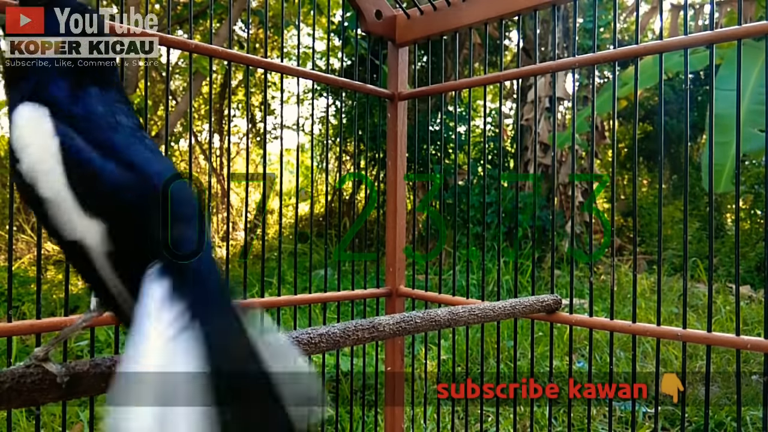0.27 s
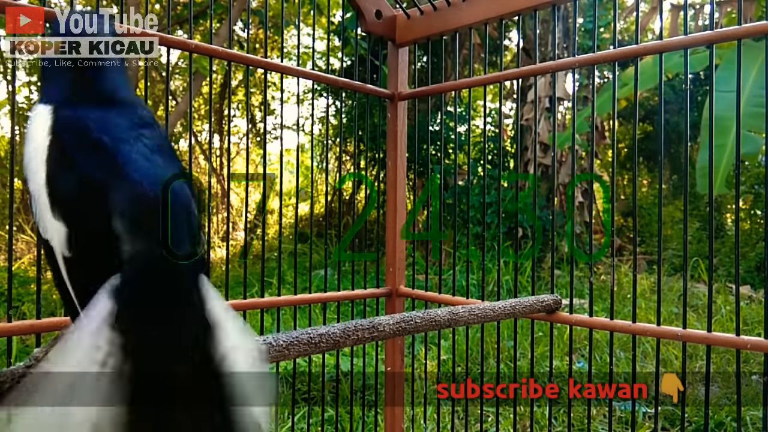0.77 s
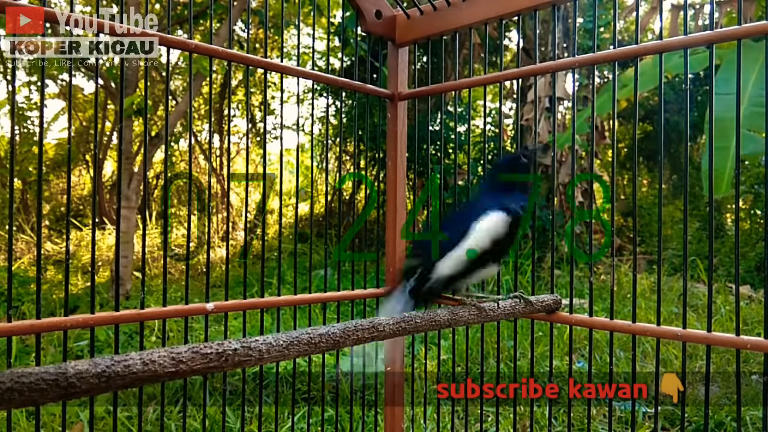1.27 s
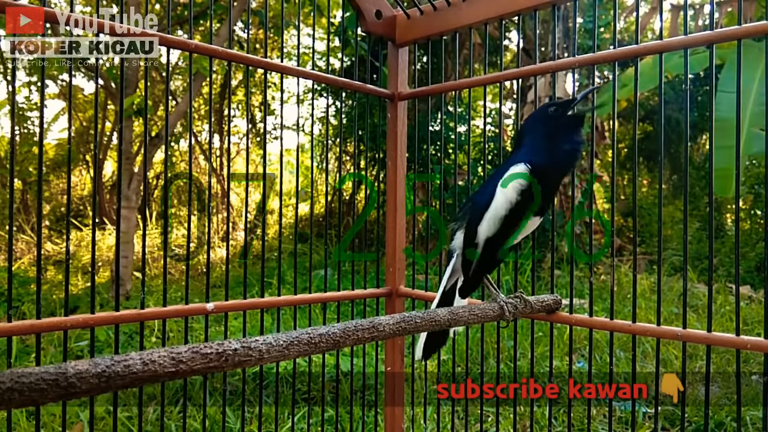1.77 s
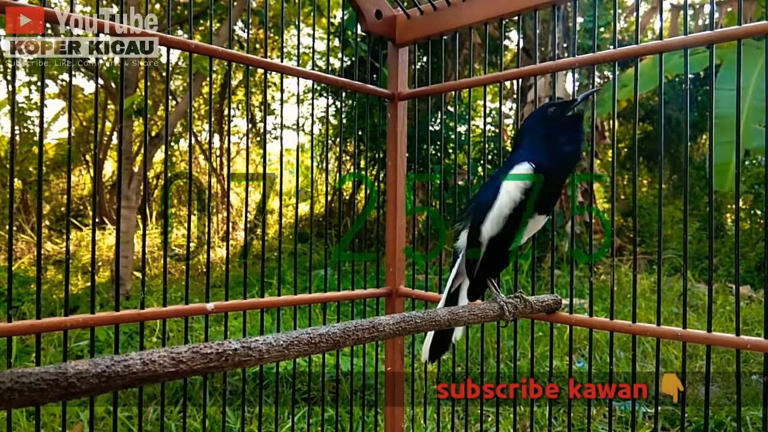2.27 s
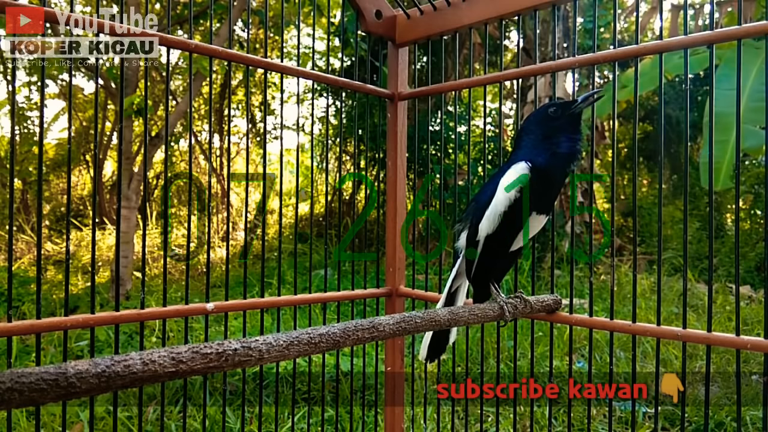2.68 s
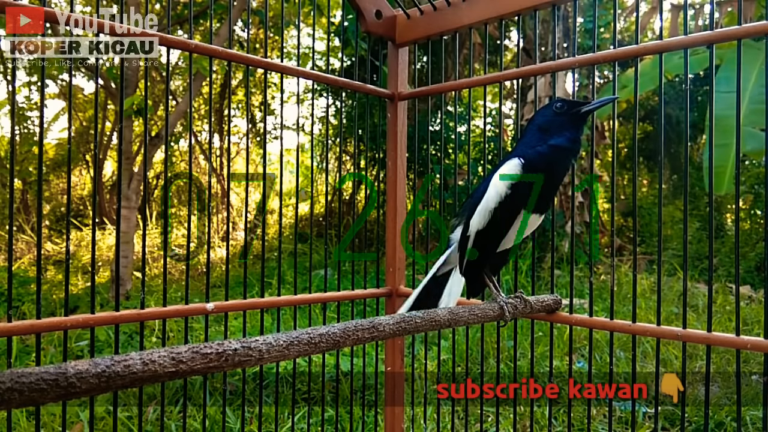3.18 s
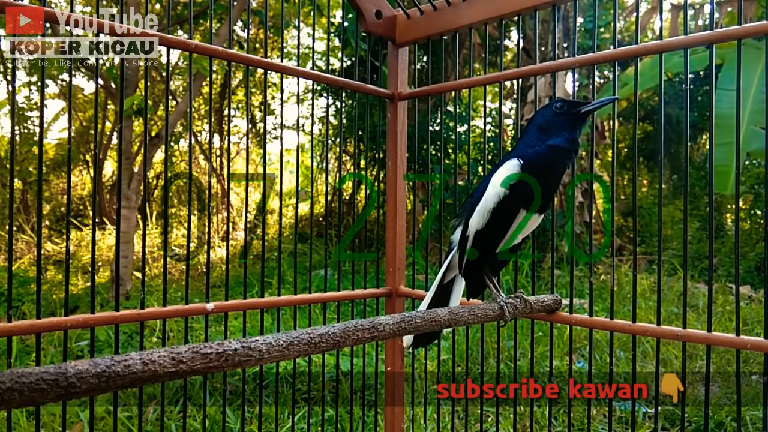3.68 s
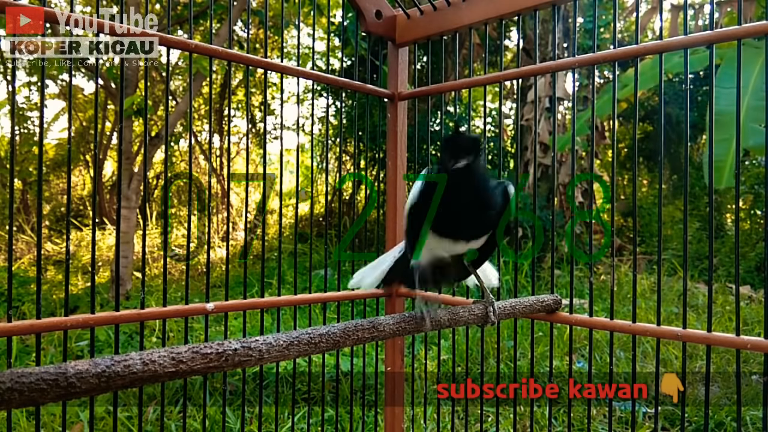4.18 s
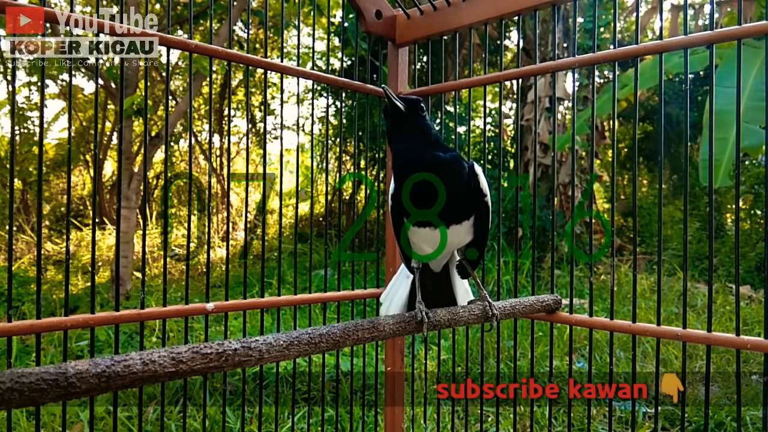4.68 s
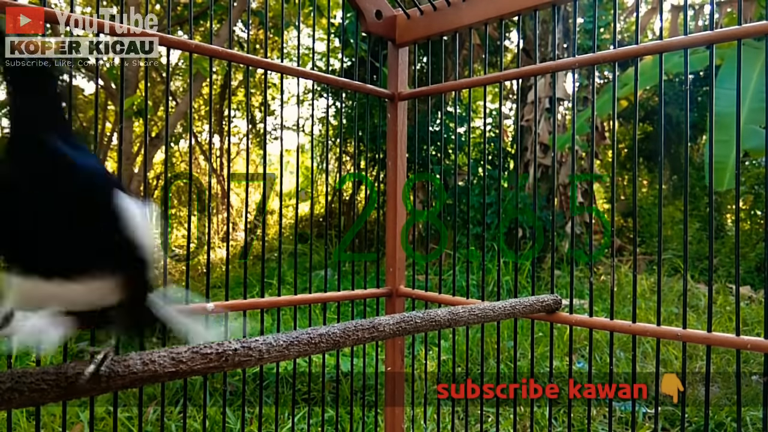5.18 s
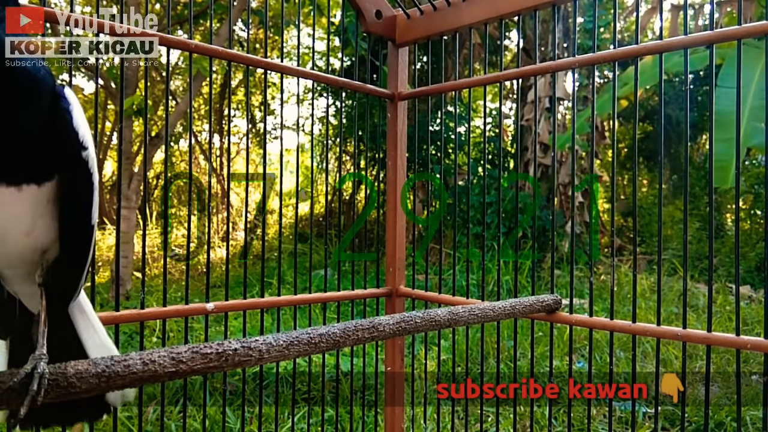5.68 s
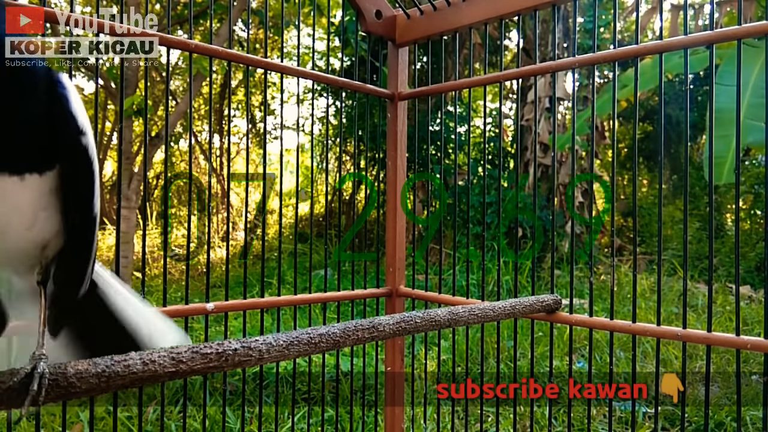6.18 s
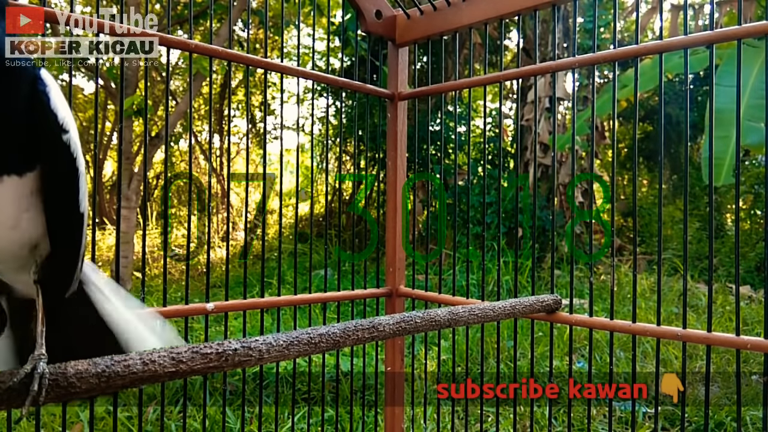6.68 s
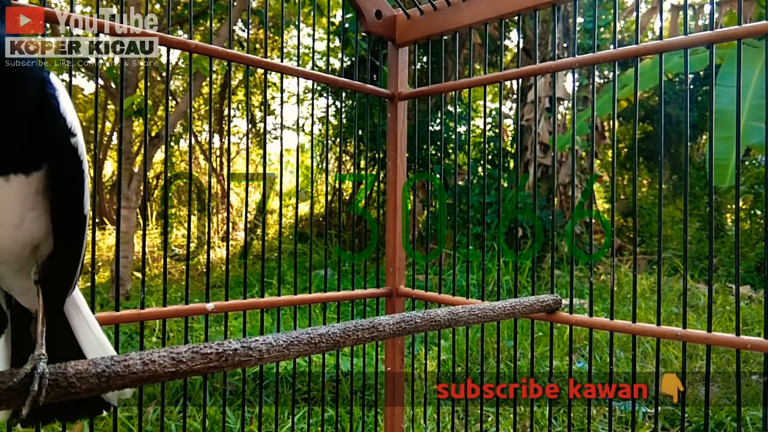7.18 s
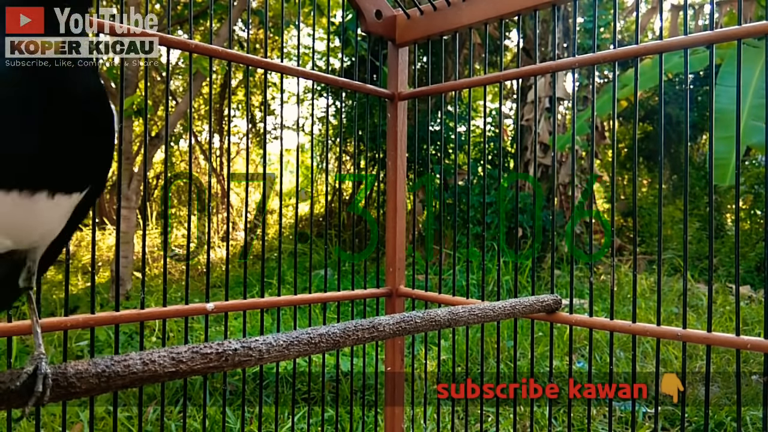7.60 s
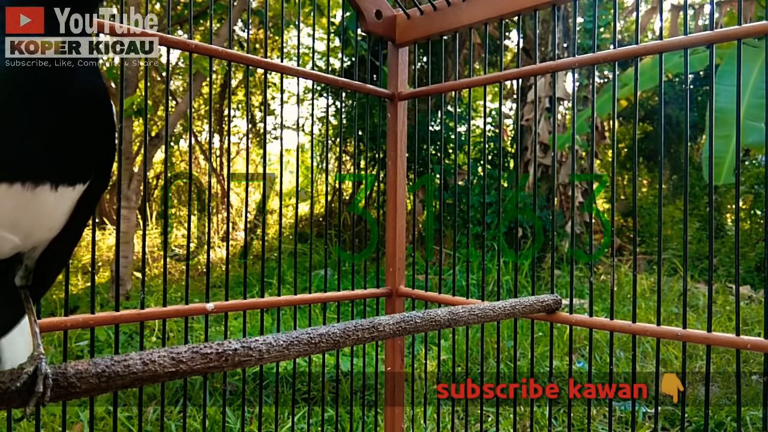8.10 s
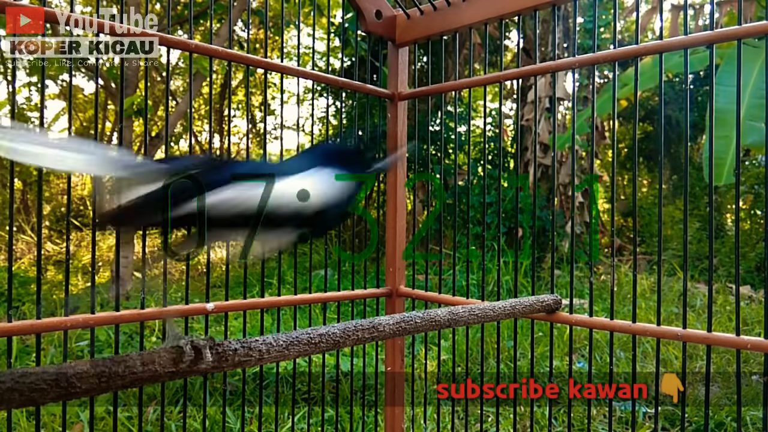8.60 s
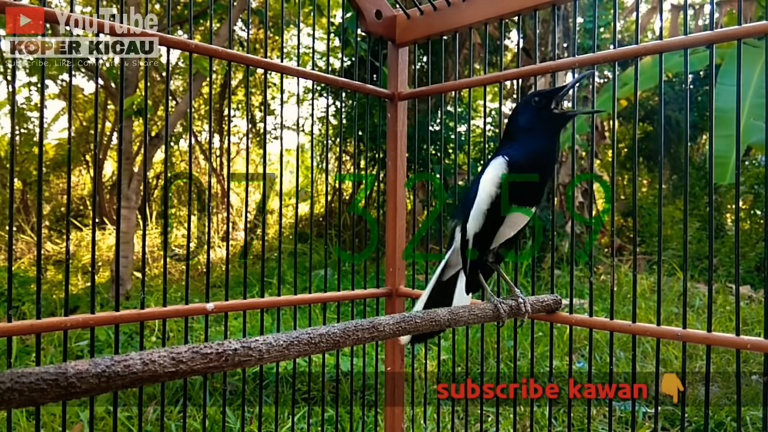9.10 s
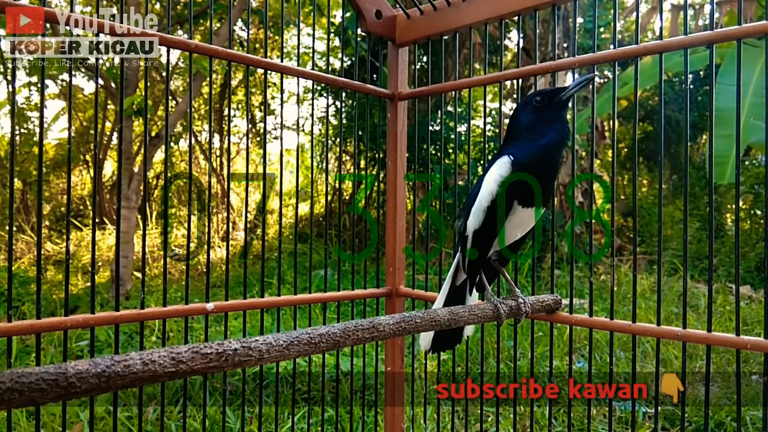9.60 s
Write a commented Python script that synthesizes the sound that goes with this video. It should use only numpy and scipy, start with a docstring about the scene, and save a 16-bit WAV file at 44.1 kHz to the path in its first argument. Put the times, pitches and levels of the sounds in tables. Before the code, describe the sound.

Outdoors, a close caged bird gives quiet rasps and quick whistles, then a loud run of trills and dropping notes. After a gap filled by a distant echoing bird, it fires sharp high chirps framed by harsh rasps, falls silent for several seconds, then returns with squeaky chatter and another chirp burst. Low traffic swells and a distant engine hums beneath; the close microphone overloads on peaks.

```python
"""A yard: a caged songbird close to a microphone sings whistles, trills, chirps and rasps that overload it.
A second bird sings further off, blurred by echoes. Tonal notes are partials along pitch and level curves;
rasps are pulses and noise through a random throat. Shaped noises make air, buzz, rustle, traffic and road wash;
plain tones make a cricket and a distant engine."""
import sys
import numpy as np
from scipy import signal
from scipy.fft import rfft, irfft
from scipy.io import wavfile
from scipy.ndimage import uniform_filter1d

SR = 44100
rng = np.random.default_rng(int(sys.argv[2]) if len(sys.argv) > 2 else 0)


def pcm_store(signal):
    """Save signal as 16-bit PCM."""
    levels = np.round(np.clip(np.atleast_2d(signal), -1, 1) * 32767)
    wavfile.write(sys.argv[1], SR, levels.astype(np.int16).T)


N = 434367

# All table levels are source levels, ahead of the bird mix gains and record().


def near_bird():
    """Mostly direct sound, with a faint echo tail."""
    dry = np.zeros(N)
    for row in drops() + slides() + arches() + rasp_tones() + near_phrases():
        add(dry, *note(*row, ramp_s=0.0013, round_s=0.0058, waver_db=2.5))
    for rows in trill_voices():
        add(dry, *note(1, -17, rows, ramp_s=0.0087, round_s=0.0057, waver_db=4.5))
    for row in CHIRPS:
        add(dry, *chirp(*row))
    for row in RASPS:
        add(dry, *rasp(*row))
    # mostly low treble comes back
    band = signal.butter(3, [3600, 9000], "band", fs=SR, output="sos")
    thin = signal.sosfilt(band, dry)
    return gain_of(4.5) * dry + gain_of(-9.5) * yard(thin, t60_s=0.37, first_s=0.0041)


# Loud falling syllables; bend over 1 falls late, under 1 early:
# (time [s], length [s], top [Hz], bottom [Hz], bend [-], level [dB])
DROPS = [(1.587, 0.034, 3557, 3270, 0.46, -6), (1.694, 0.03, 3140, 2490, 2.5, -2.5),
         (1.856, 0.035, 3054, 2380, 1.94, -2), (2.026, 0.014, 3010, 2380, 1.9, -6),
         (2.19, .031, 3320, 2500, .55, -7), (2.344, 0.031, 3420, 2493, 0.36, -6)]


def drops():
    """Falling syllables that swell in, then fade: (loudest partial, neighbours dB, rows)."""
    return [(1, -34, glide(s, length, top_hz, bottom_hz, db, fade_db=-4, bend=bend,
                           attack_s=0.011, attack_db=-6.5))
            for s, length, top_hz, bottom_hz, bend, db in DROPS]


# Low slides that follow a drop: (time [s], length [s], start [Hz], level [dB])
SLIDES = [(1.723, 0.021, 2500, -10.5), (1.891, 0.015, 2200, -12.5), (2.216, 0.043, 1930, -14.5),
          (2.368, 0.045, 1930, -17.5)]


def slides():
    """Low notes that slide to 0.74 of their start pitch as they fade."""
    return [(1, -25.5, glide(s, length, hz, 0.74 * hz, db, fade_db=-14.5, bend=1.7))
            for s, length, hz, db in SLIDES]


# Whistles that bend: (time [s], length [s], turn [share of length], loudest partial [-],
# its neighbours [dB], its start [Hz], its turn [Hz], its end [Hz], level [dB])
ARCHES = [(0.304, 0.046, 0.16, 2, -14, 2774, 2937, 2873, -23),
          (0.536, 0.046, 0.57, 1, -13, 3050, 3396, 2260, -19),
          (0.55, 0.045, .5, 1, -20.5, 5420, 5940, 4400, -17),
          (0.893, 0.012, 0.27, 1, -6, 2800, 2920, 2930, -27.5),
          (1.737, 0.04, 0.34, 2, -25.5, 3020, 3188, 3026, -2.5),
          (1.899, 0.036, 0.26, 2, -28, 2834, 3005, 3094, -3.5),
          (4.142, 0.036, 0.56, 2, -23.5, 3095, 3260, 2940, -6),
          (4.655, 0.027, 0.66, 1, -9.5, 3680, 4593, 4420, -12),
          (8.193, 0.029, 0.54, 1, -22.5, 1603, 3724, 3580, -2.5),
          (8.193, 0.0063, .6, 1, -10, 2720, 4380, 5700, -1.5),
          (8.228, 0.015, 0.47, 2, -17, 4010, 5990, 4580, -12),
          (8.239, 0.0094, 0.37, 1, -10, 3650, 3530, 3480, -9),
          (8.264, 0.022, 0.53, 2, -9, 3630, 5240, 6260, -13),
          (8.302, 0.017, 0.66, 2, -14.5, 3820, 5290, 5240, -9),
          (8.339, 0.022, 0.27, 2, -18, 4190, 4644, 4030, -10.5),
          (8.38, 0.021, .25, 2, -20, 3635, 3510, 3340, -19),
          (8.914, 0.047, .6, 2, -19, 2726, 3468, 2960, -13.5),
          (9.474, 0.023, 0.93, 1, -16, 4100, 4520, 4470, -7)]


def arches():
    """Arched whistles, loudest at the turn."""
    return [(round(loudest), side_db, arch(s, length, turn, *rest))
            for s, length, turn, loudest, side_db, *rest in ARCHES]


def arch(s, length, turn, start_hz, turn_hz, end_hz, db):
    """Rows of a whistle that swells and bends to its turn, then leaves it."""
    start_db, end_db, roundness = -15, -3, 2.2
    u = np.linspace(0, 1, 25)
    turn = np.clip(turn, .05, .95)
    before = np.maximum(1 - u / turn, 0) ** roundness
    after = np.maximum((u - turn) / (1 - turn), 0) ** roundness
    hz = turn_hz + (start_hz - turn_hz) * before + (end_hz - turn_hz) * after
    return np.transpose([s + u * length, hz, db + start_db * before + end_db * after])


# Nearly steady tones, most inside rasps: (time [s], length [s], start [Hz], end [Hz], level [dB])
RASP_TONES = [(0.349, 0.14, 2692, 2646, -33), (2.068, 0.032, 3365, 3470, -18),
              (2.314, 0.062, 3440, 3430, -20.5), (2.324, 0.066, 3780, 3780, -26.5),
              (2.08, 0.016, 2470, 2700, -10.5), (2.561, 0.029, 2450, 2660, -11),
              (4.126, 0.027, 4425, 4474, -20.5), (8.901, 0.068, 4080, 4245, -17.5)]


def rasp_tones():
    """Nearly steady partials that swell in quickly."""
    return [(1, -28, glide(*row, fade_db=-3, attack_s=0.008, attack_db=-13)) for row in RASP_TONES]


# Free phrases, rows of (time [s], pitch [Hz], level [dB])
NEAR_PHRASES = [
    [(.373, 6200, -20), (.383, 6250, -30.5), (.406, 5370, -17), (.445, 5720, -26), (.494, 5160, -13.5),
     (.508, 3720, -10.5), (.519, 3880, -21), (.525, 3620, -5)],
    [(.804, 4380, -14), (.813, 3560, -3.5), (.831, 4425, -1.5), (.835, 3700, -1), (.844, 4060, -9.5),
     (.849, 5280, -19), (.856, 4670, -18), (.862, 5700, -25.5), (.869, 3730, -16), (.875, 5360, -20),
     (.882, 3520, -20.5), (.895, 3740, -10.5)],
    [(2.507, 1953, -30), (2.525, 2120, -13), (2.558, 2230, -10.5), (2.6, 2147, -14.5), (2.725, 2101, -20.5),
     (2.742, 2040, -29.5)],
    [(2.041, 2077, -19.5), (2.058, 2072, -13.5), (2.08, 1700, -27.5), (2.1, 1855, -26), (2.117, 2120, -25)],
]


def near_phrases():
    """Whistles through free pitch and level points."""
    return [(1, -21, rows) for rows in NEAR_PHRASES]


# Fast uneven trill, turning points of two simultaneous voices: (time [s], pitch [Hz])
TRILL = [
    [(1.484, 3700), (1.495, 5410), (1.503, 3850), (1.514, 5200), (1.524, 3677), (1.537, 5050),
     (1.548, 2900), (1.559, 4750), (1.567, 2990), (1.577, 4790), (1.584, 2820)],
    [(1.48, 2917), (1.495, 3854), (1.503, 3210), (1.515, 3890), (1.524, 3340)],
]
TRILL_START_DB, TRILL_FADE_DB_PER_S = (-7.5, -15.5), -67


def trill_voices():
    """Rows of each trill voice; pitch zigzags while the level fades steadily."""
    return [[(s, hz, db + TRILL_FADE_DB_PER_S * (s - points[0][0])) for s, hz in points]
            for points, db in zip(TRILL, TRILL_START_DB)]


# Chirps: (time [s], lead-in length [s], start [Hz], top [Hz], level [dB])
CHIRPS = [(4.207, 0.014, 3423, 6270, 1), (4.238, 0.00062, 5670, 5580, -0.5), (4.264, 0.017, 5550, 5860, -1),
          (4.289, 0.0046, 5330, 5260, -6), (4.306, 0.00039, 5970, 5900, -15),
          (4.322, 0.0013, 6170, 6180, 1), (4.335, 0.0047, 6000, 6010, -2), (4.348, 0.0043, 5270, 5420, -6),
          (4.363, 0.0031, 4870, 4760, -10.5), (4.545, 0.012, 5540, 6340, -10.5),
          (4.595, 0.022, 6370, 6560, -3), (8.985, .016, 3194, 6100, -1.5), (9.014, 0.0038, 5650, 5470, 1),
          (9.039, 0.017, 5710, 6150, -5.5), (9.067, 0.004, 5120, 5680, -0.5),
          (9.085, 0.0004, 5850, 5370, -8), (9.101, 0.0051, 5570, 5810, -4.5),
          (9.112, 0.0053, 5630, 5810, -0.5), (9.125, 0.0041, 4430, 5530, -1.5),
          (9.144, 0.0019, 5370, 5200, -7), (9.158, 0.0063, 5770, 5810, 4), (9.35, 0.015, 5620, 6620, -13),
          (9.404, 0.02, 6280, 6440, -5.5)]
TUMBLE_S, TUMBLE_RATIO, TUMBLE_DB, LEAD_DB = 0.0075, 0.49, -29, -8.5
GAP_DB, GAP_S, GAP_FULL_LEAD_S = -12.5, 0.0021, 0.012


def chirp(s, lead_s, start_hz, top_hz, db):
    """A lead-in glides to the top pitch, then pitch and level tumble; the breath dips late in a long lead-in."""
    t = np.arange(0, lead_s + TUMBLE_S, 1 / SR)
    lead = np.clip(1 - t / lead_s, 0, 1)
    tumble = np.clip((t - lead_s) / TUMBLE_S, 0, 1)
    hz = top_hz * (1 - (1 - TUMBLE_RATIO) * tumble ** 1.72) + (start_hz - top_hz) * lead ** 2.0
    gap_depth = min(lead_s / GAP_FULL_LEAD_S, 1) ** 2
    gap = gap_depth * np.exp(-((t - 0.68 * lead_s) / GAP_S) ** 2)
    hz = hz * (1 - 0.037 * gap) * (1 + 0.004 * waver(len(t), 0.0006))
    level = gain_of(db + LEAD_DB * lead + GAP_DB * gap + TUMBLE_DB * tumble ** 2)
    return s, level * voice(hz, 1, -21.5, -7) * edges(len(t), 0.0033)


# Spectrum of the rasps: (frequency [Hz], relative level [dB per Hz])
RASP_COLOUR = [(290, -59.5), (850, -15.5), (1500, -17), (2290, -7), (3750, 5), (5090, -3), (16000, -26)]
# Harsh rasps: (time [s], length [s], level [dB], level change over the rasp [dB],
# mean pulse rate at start [Hz], at end [Hz])
RASPS = [(0.126, 0.075, -26, 19.5, 1402, 1840), (0.29, 0.025, -25.5, 19, 1374, 1230),
         (1.481, 0.066, -23, 6, 1598, 1220), (1.761, 0.041, -19.5, -9, 1487, 1200),
         (1.919, 0.04, -22.5, -1.5, 1506, 1230), (2.076, 0.068, -25, -11.5, 1670, 1530),
         (2.194, 0.045, -20.5, -10.5, 1509, 1350), (2.337, 0.071, -24, 2, 1576, 980),
         (4.1218, 0.076, -12, 2.5, 1489, 1380), (4.37, 0.097, -15.5, -6.5, 1580, 1390),
         (8.23, 0.021, -8, 12, 2670, 2700), (8.263, 0.027, -10, -3, 1880, 3300),
         (8.302, 0.021, -9.5, -15, 2000, 2800), (8.347, 0.037, -15.5, -43.5, 2280, 1840),
         (8.376, 0.041, -21.5, 4, 1780, 1650), (8.903, 0.072, -14, 5, 1398, 1600),
         (9.173, 0.1, -14.5, -11, 1603, 1380)]


def rasp(s, length, db, fade_db, start_hz, end_hz):
    """Chaotic flutter of the syrinx: badly timed pulses and breath noise, in quick uneven puffs."""
    size = round(length * SR)
    jitter = 1 + .06 * waver(size, .001) + .04 * waver(size, .01)
    turns = np.cumsum(np.linspace(start_hz, end_hz, size) * jitter) / SR
    pulses = np.diff(np.floor(turns), prepend=0) * gain_of(3 * waver(size, .0004))
    # one random, decaying throat response for each rasp
    throat = rng.standard_normal(36) * gain_of(np.linspace(0, -26, 36))
    pulses = np.convolve(pulses, throat / np.linalg.norm(throat))[:size]
    drive = shaped(5 * pulses + .4 * rng.standard_normal(size), RASP_COLOUR)
    puffs = gain_of(1.2 * waver(size, .001) + 2 * waver(size, .005))
    puffs = puffs / np.sqrt(np.mean(puffs ** 2))
    release_s = 0.023
    puffs = puffs * np.minimum(np.arange(size)[::-1] / SR / release_s, 1)
    level = gain_of(db + fade_db * np.linspace(0, 1, size) ** 2)
    return s, drive * puffs * level * edges(size, 0.00099)


def far_bird():
    """Direct sound and echoes are of like strength, so glides waver and smear."""
    dry = np.zeros(N)
    for side_db, rows in rises() + hoops() + glides() + far_phrases():
        add(dry, *note(1, side_db, rows, ramp_s=0.004, round_s=.014, waver_db=3, flutter=.004))
    for rows in hoarse_tones():
        add(dry, *note(1, -15.5, rows, ramp_s=0.004, round_s=0.0018, waver_db=2.5, flutter=0.0372))
    return gain_of(-2.0) * dry + gain_of(-2.0) * yard(dry, t60_s=0.4, first_s=0.0023)


# Swelling upsweeps: (time [s], length [s], start [Hz], end [Hz], level [dB])
RISES = [(0.731, 0.068, 2580, 4050, -19), (2.121, 0.061, 2430, 3040, -12.5),
         (6.042, 0.089, 2572, 3963, -18.5)]


def rises():
    """Upsweeps that climb early and swell in: (overtone dB, rows)."""
    return [(-28, glide(*row, bend=0.64, attack_s=0.042, attack_db=-16.5)) for row in RISES]


# Outline of a hoop: (time [share of length], pitch [share of top], level [dB])
HOOP = [(0, .66, -23), (.42, .93, -3.5), (.58, 1, -4), (.8, .985, -2), (1, .74, -18.5)]
# Low hoops: (time [s], length [s], top [Hz], level added to the outline [dB])
HOOPS = [(7.272, 0.175, 2840, -29.5), (7.653, 0.19, 2826, -28.5)]


def hoops():
    """Notes that rise and fall along one shared outline."""
    return [(-9, np.multiply(HOOP, (length, top_hz, 1)) + (s, 0, db)) for s, length, top_hz, db in HOOPS]


# Plain glides: (time [s], length [s], start [Hz], end [Hz], level [dB], level change [dB])
GLIDES = [(0.021, 0.107, 3537, 3313, -30, -8.5), (0.214, 0.05, 2466, 2630, -33, 2),
          (2.39, .11, 2832, 2912, -20.5, -2), (2.637, 0.089, 2530, 3000, -34, 9),
          (2.723, 0.34, 3190, 3416, -23, -15.5), (2.76, 0.3, 3023, 3105, -24, -5),
          (3.201, 0.036, 2590, 1990, -17, -23.5), (3.301, 0.059, 1400, 1820, -40, -4.5),
          (7.707, 0.028, 3720, 4250, -24.5, -8), (7.435, 0.047, 4230, 3397, -27, 10),
          (7.634, 0.063, 3729, 3784, -15, -3), (2.146, 0.03, 4210, 3590, -23, 1.5),
          (3.553, 0.13, 4230, 3880, -41, -5), (7.975, 0.33, 2884, 3042, -28, -1),
          (9.272, 0.23, 4150, 3700, -37.5, 2.5)]


def glides():
    """One-way glides that move slightly early."""
    return [(-32, glide(*row, bend=0.89, attack_s=0.026, attack_db=-1)) for row in GLIDES]


# Free phrases, rows of (time [s], pitch [Hz], level [dB])
FAR_PHRASES = [
    [(.905, 3755, -2.5), (.93, 4080, -30.5), (.992, 3720, -20.5), (1.227, 2643, -31), (1.364, 2591, -27),
     (1.47, 2470, -84.5)],
    [(1.8, 4000, -30), (1.91, 3634, -21.5), (1.99, 4270, -32), (2.025, 5700, -39.5), (2.07, 5100, -36.5)],
    [(2.95, 6500, -33), (2.965, 4720, -22.5), (2.99, 3690, -16.5), (3.05, 3430, -20), (3.062, 2660, -22)],
    [(3.125, 2520, -35), (3.15, 2778, -15), (3.195, 2710, -16.5)],
    [(6.15, 4610, -17), (6.221, 4100, -15.5), (6.32, 3690, -20), (6.436, 3207, -23), (6.627, 2634, -32),
     (6.749, 2986, -29), (6.846, 3817, -19), (6.87, 3510, -52)],
    [(8.465, 3123, -30.5), (8.634, 3122, -22), (8.762, 3075, -47), (8.9, 3105, -53)],
    [(3.525, 2490, -37.5), (3.548, 2718, -17.5), (3.565, 2700, -16.5), (3.635, 2574, -31.5),
     (3.74, 2646, -34)],
    [(7.038, 3976, -27), (7.065, 4056, -18), (7.115, 3060, -21)],
    [(7.222, 3000, -24.5), (7.262, 3802, -21), (7.288, 3760, -18), (7.312, 4340, -27)],
    [(2.7, 2390, -25.5), (2.74, 2704, -19.5), (2.8, 2585, -26), (2.855, 1934, -28.5)],
    [(9.635, 1890, -49), (9.669, 2400, -36.5), (9.762, 3190, -27), (9.84, 3020, -63)],
]


def far_phrases():
    """Whistles through free pitch and level points."""
    return [(-31, rows) for rows in FAR_PHRASES]


# Hoarse tones: (time [s], length [s], start [Hz], end [Hz], level [dB])
HOARSE = [(0., 0.011, 3280, 3070, -19), (6.089, 0.049, 6680, 7630, -29), (6.105, 0.072, 6270, 6250, -23),
          (6.114, 0.065, 5120, 4780, -25), (6.122, 0.057, 3486, 3234, -24.5), (6.2, 0.025, 2990, 2250, -27),
          (6.23, 0.033, 5800, 5830, -23.5), (6.23, .04, 4480, 3890, -18)]


def hoarse_tones():
    """Rows of short glides, to be played with a strong pitch flutter."""
    return [glide(*row) for row in HOARSE]


def yard(x, t60_s, first_s):
    """Sparse echoes of random sign dying away; energy 1."""
    at = np.arange(round(first_s * SR), SR // 2, 20)
    at = at + rng.integers(0, 20, len(at))
    taps = np.zeros(SR // 2 + 20)
    taps[at] = rng.choice([-1., 1.], len(at)) * gain_of(-60 * at / SR / t60_s)
    return signal.fftconvolve(x, taps / np.linalg.norm(taps))[:N]


# Spectrum of the buzz: (frequency [Hz], relative level [dB per Hz])
BUZZ_COLOUR = [(600, -45.5), (1000, -22.5), (3900, 3.5), (8780, -6), (14000, -34)]
# Level of the buzz: (time [s], level [dB])
BUZZ_DB = [(2.95, -56), (3.2, -39.5), (3.8, -43), (3.95, -64.5), (6.76, -73), (6.79, -39.5), (7.55, -40),
           (7.9, -48), (8.2, -54)]


def buzz():
    """Wide shaped noise that comes and goes."""
    return curve(BUZZ_DB) * noise(BUZZ_COLOUR, N)


CRICKET_HZ, CRICKET_PEAK_DB, CRICKET_THROBS_PER_S = 5420, -56, 38


def cricket():
    """A narrow tone gated by half-sine throbs, with a wavering level."""
    t = np.arange(N) / SR
    throb = np.maximum(np.sin(2 * np.pi * CRICKET_THROBS_PER_S * t), 0)
    level = gain_of(CRICKET_PEAK_DB + 2 * waver(N, 0.046))
    return level * throb * np.sin(2 * np.pi * CRICKET_HZ * t)


RUSTLE_S, RUSTLE_LENGTH_S, RUSTLE_DB = 5.11, .12, -49


def rustle():
    """A soft low puff of shaped noise as the bird hops."""
    size, out = round(RUSTLE_LENGTH_S * SR), np.zeros(N)
    puff = noise([(700, -27.5), (2500, -21.5), (8000, -40.0)], size)
    level = gain_of(RUSTLE_DB + 2.1 * waver(size, 0.024))
    add(out, RUSTLE_S, level * puff * edges(size, 0.011))
    return out


# Spectrum of insects and leaves: (frequency [Hz], relative level [dB per Hz])
AIR_COLOUR = [(200, -29.5), (300, -12), (1000, -23.5), (2500, -23.5), (4500, -24), (5900, -21.5),
              (6550, -10), (7350, -15.5), (8750, 4), (10500, -26), (16000, -44.5)]


def air():
    """Steady shaped noise of insects and leaves."""
    return gain_of(-45) * noise(AIR_COLOUR, N)


# Spectrum of the traffic: (frequency [Hz], relative level [dB per Hz])
TRAFFIC_COLOUR = [(15, -41), (70, 0), (100, 2), (150, -3.5), (600, -26), (1100, -61)]
# Level of the traffic: (time [s], level [dB])
TRAFFIC_DB = [(0, -50), (2.5, -45), (3.8, -45.5), (4.7, -48.5), (6, -45.5), (7.6, -39.5), (9.85, -47)]


def traffic():
    """Low shaped noise that swells and sinks."""
    return curve(TRAFFIC_DB) * noise(TRAFFIC_COLOUR, N)


# Spectrum of the road wash: (frequency [Hz], relative level [dB per Hz])
WASH_COLOUR = [(200, -19), (350, -4), (1000, -7.5), (2500, -6.5), (5000, -17), (7000, -44)]
# Level of the road wash: (time [s], level [dB])
WASH_DB = [(0, -58), (2.6, -51), (3.6, -58.5), (4.8, -58.5), (7.6, -52), (8.7, -51.5), (9.85, -57.5)]


def road_wash():
    """Broad shaped noise from the road."""
    return curve(WASH_DB) * noise(WASH_COLOUR, N)


# Engine whine: (time [s], pitch [Hz], level [dB])
WHINE = [(5.3, 930, -68.5), (5.7, 1052, -75.5), (7.3, 1046, -66.5), (7.9, 893, -67)]
# Engine drone: (time [s], pitch [Hz], level [dB])
DRONE = [(5.8, 105, -61), (7.2, 111.7, -48), (8.9, 123.6, -43.5), (9.4, 122.7, -64)]


def engine():
    """A distant engine: a strongly wavering whine and a steadier drone."""
    return engine_tone(WHINE, waver_db=7.2) + engine_tone(DRONE, waver_db=0.5)


def engine_tone(rows, waver_db):
    """A faint sine along pitch and level curves, with a wavering level."""
    s, hz, db = np.transpose(rows)
    t, out = np.arange(s[0], s[-1], 1 / SR), np.zeros(N)
    tone = np.sqrt(2) * np.sin(2 * np.pi * np.cumsum(np.interp(t, s, hz)) / SR)
    level = gain_of(np.interp(t, s, db) + waver_db * waver(len(t), 0.029))
    add(out, s[0], level * tone * edges(len(t), 0.16))
    return out


def glide(s, length, start_hz, end_hz, db, fade_db=0, bend=1, attack_s=.001, attack_db=0):
    """Rows (time s, pitch Hz, level dB) of a one-way glide with an attack and a level slope."""
    u = np.linspace(0, 1, 17)
    level_db = db + fade_db * u + attack_db * np.maximum(1 - u * length / attack_s, 0)
    hz = start_hz + (end_hz - start_hz) * u ** max(bend, .1)
    return np.transpose([s + u * length, hz, level_db])


def note(loudest, side_db, rows, ramp_s, round_s, waver_db, flutter=0.005):
    """One whistle along a rounded pitch curve and a level curve, both slightly unsteady."""
    s, hz, db = np.transpose(rows)
    t = np.arange(s[0], s[-1], 1 / SR)
    pitch_hz = uniform_filter1d(np.interp(t, s, hz), round(round_s * SR), mode="nearest")
    pitch_hz = pitch_hz * (1 + flutter * waver(len(t), 0.0013))
    level = gain_of(np.interp(t, s, db) + waver_db * waver(len(t), 0.0037))
    return s[0], level * voice(pitch_hz, loudest, side_db, slope_db=-5.5) * edges(len(t), ramp_s)


def voice(hz, loudest, side_db, slope_db):
    """Partials of the syrinx; hz is the loudest one, the others fall away on both sides of it."""
    phase = 2 * np.pi * np.cumsum(hz / loudest) / SR
    out = np.sin(loudest * phase)
    for k in range(1, 6 * loudest + 1):
        away = abs(k - loudest)
        if away:
            below_limit = k * hz / loudest < SR / 2.2
            out += gain_of(side_db + slope_db * (away - 1.5)) * np.sin(k * phase) * below_limit
    return np.sqrt(2) * out


def waver(size, span_s):
    """Smoothed noise of rms about 1 that changes over span_s."""
    span = round(span_s * SR)
    smooth = uniform_filter1d(uniform_filter1d(rng.standard_normal(size), span), span)
    return smooth * np.sqrt(1.5 * span)


def shaped(x, colour):
    """Filters x by (Hz, dB) points on a log frequency axis and sets rms 1."""
    f, db = np.transpose(colour)
    hz = np.fft.rfftfreq(len(x), 1 / SR)
    x = irfft(rfft(x) * gain_of(np.interp(np.log(hz + 1), np.log(f), db)), len(x))
    return x / np.sqrt(np.mean(x ** 2))


def noise(colour, size):
    """Noise of rms 1 with the given spectrum."""
    return shaped(rng.standard_normal(size), colour)


def curve(rows):
    """A level curve as gain for every sample."""
    s, db = np.transpose(rows)
    return gain_of(np.interp(np.arange(N) / SR, s, db))


def edges(size, ramp_s):
    """Soft start and end."""
    return signal.windows.tukey(size, min(1, 2 * ramp_s * SR / size))


def gain_of(db):
    """Decibels to amplitude."""
    return 10 ** (np.asarray(db) / 20)


def add(mix, s, sound):
    """Mixes a sound in at time s."""
    part = mix[round(s * SR):][:len(sound)]
    part += sound[:len(part)]


def scene():
    """Both birds over the background."""
    background = buzz() + cricket() + rustle() + air() + traffic() + road_wash() + engine()
    return (near_bird() + far_bird() + background)[None]


def record(dry):
    """Gain control ducks at loud notes and recovers slowly, peaks flatten at a ceiling, then the band limit."""
    power_db = 10 * np.log10(abs(uniform_filter1d(dry[0] ** 2, 400)) + 1e-12)
    fall_db = np.arange(N) * 9.8 / SR  # the held level falls 9.8 dB/s
    held_db = np.maximum.accumulate(power_db + fall_db) - fall_db
    over_db = np.maximum(held_db + 15.5, 0)
    x = dry * gain_of(4.5 - 0.4 * uniform_filter1d(over_db, 400))
    x = x + 0.05 * x ** 2  # lopsided overload: even overtones and low thumps
    ceiling, knee = .73, 8.0
    x = x / (1 + abs(x / ceiling) ** knee) ** (1 / knee)
    lowpass = signal.firwin(511, 15600, window=("kaiser", 9), fs=SR)
    return signal.oaconvolve(x, lowpass[None], "same")


dry = scene()
out = record(dry)
pcm_store(out)
```